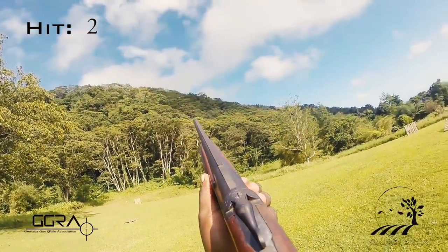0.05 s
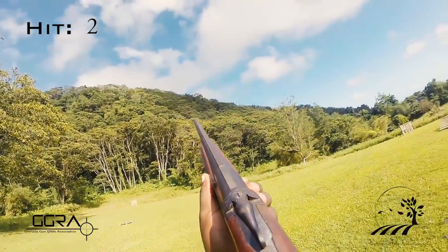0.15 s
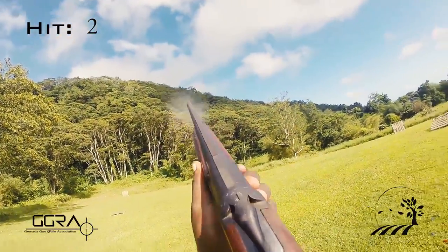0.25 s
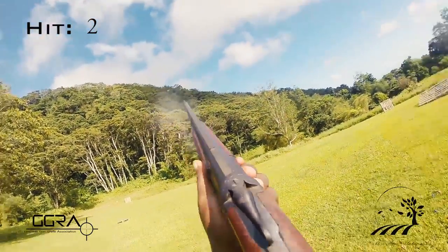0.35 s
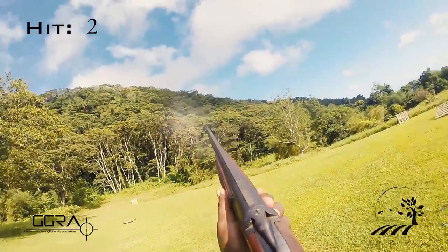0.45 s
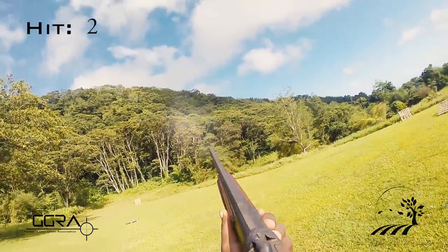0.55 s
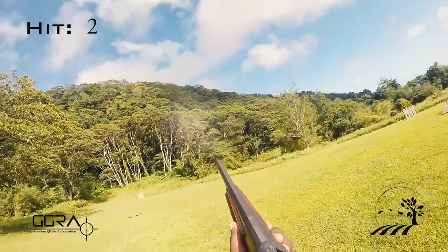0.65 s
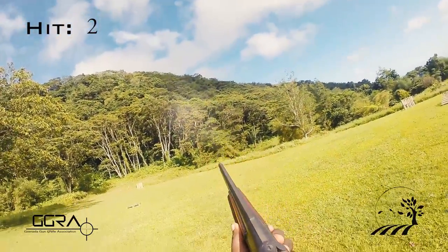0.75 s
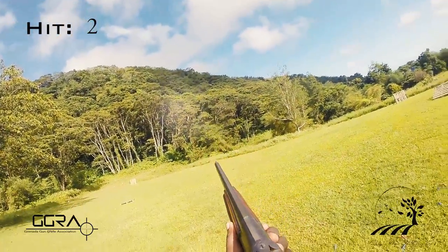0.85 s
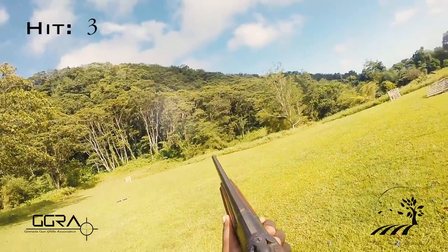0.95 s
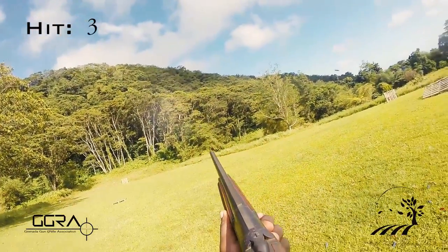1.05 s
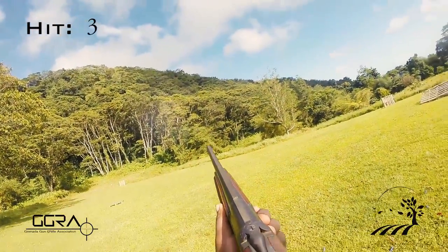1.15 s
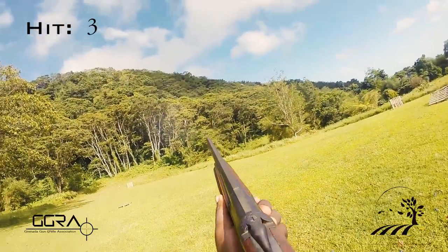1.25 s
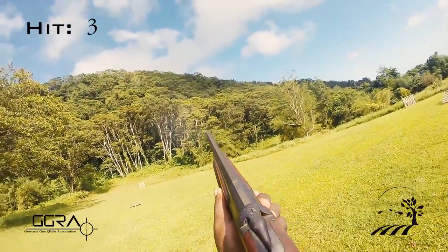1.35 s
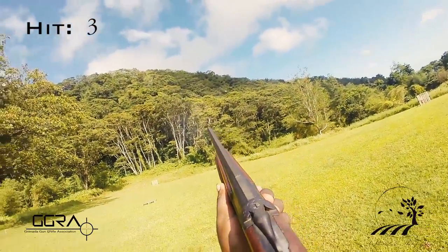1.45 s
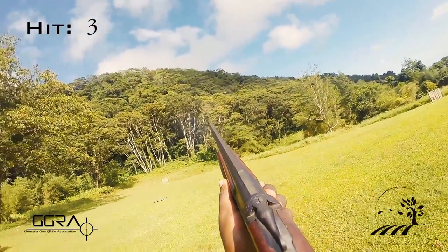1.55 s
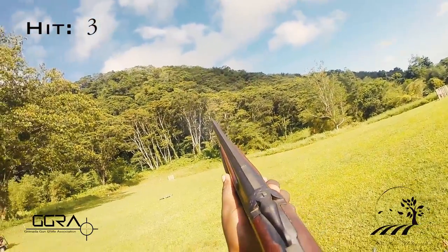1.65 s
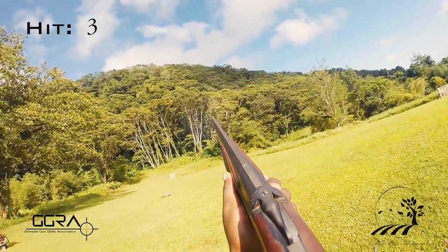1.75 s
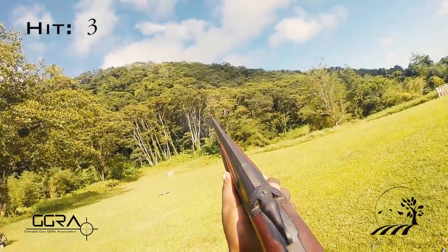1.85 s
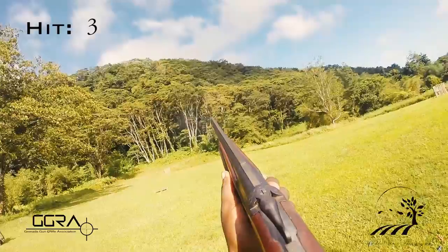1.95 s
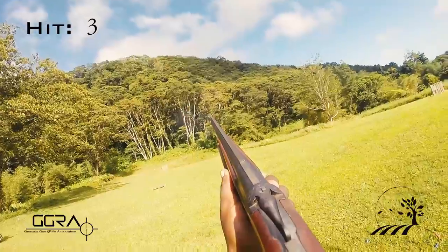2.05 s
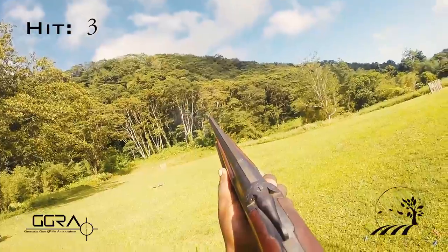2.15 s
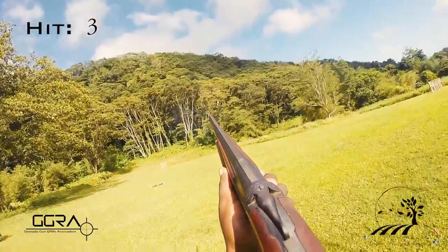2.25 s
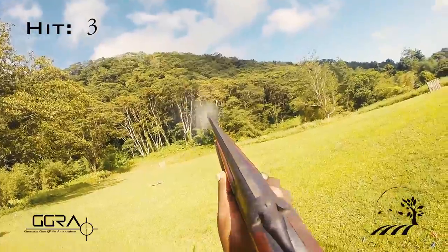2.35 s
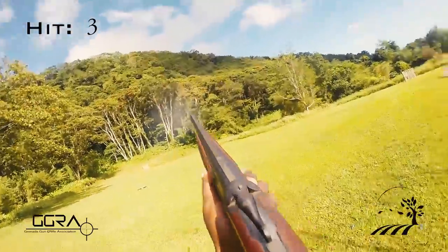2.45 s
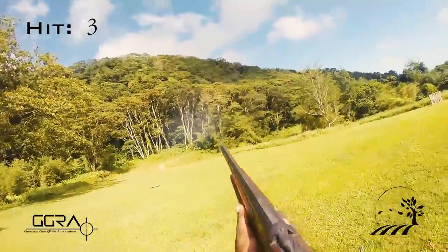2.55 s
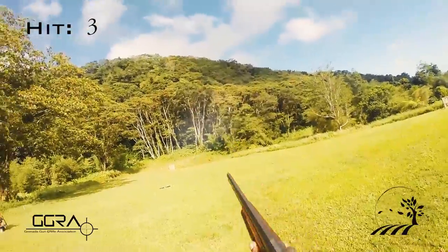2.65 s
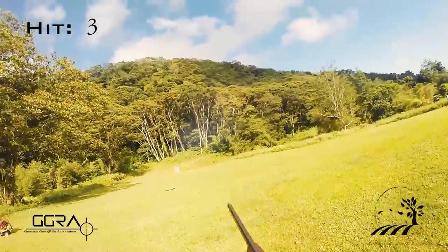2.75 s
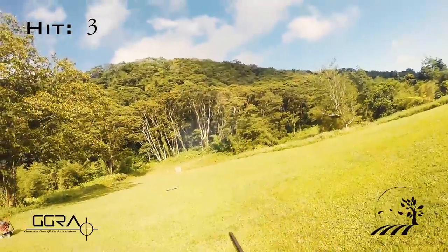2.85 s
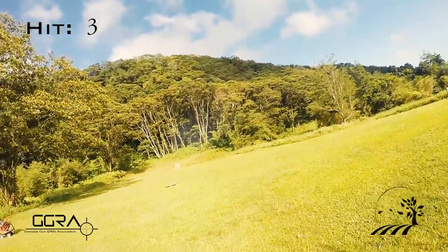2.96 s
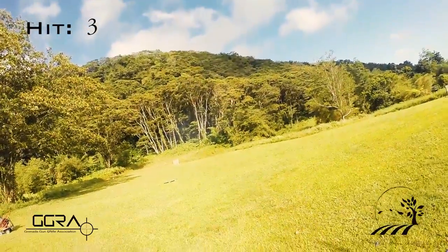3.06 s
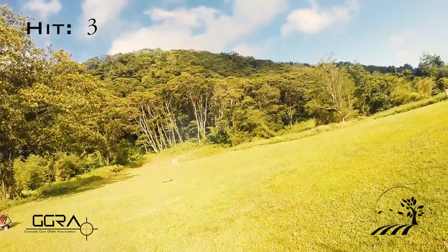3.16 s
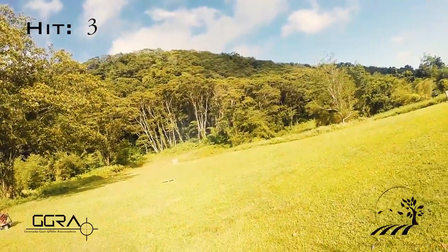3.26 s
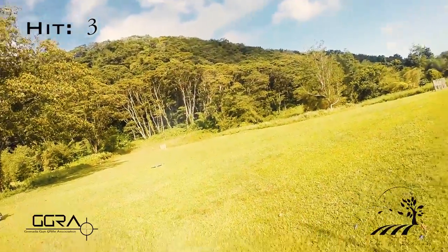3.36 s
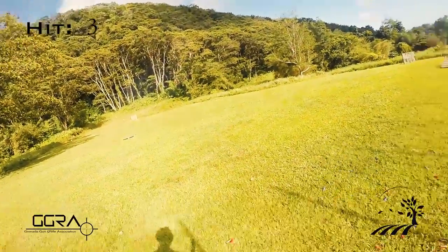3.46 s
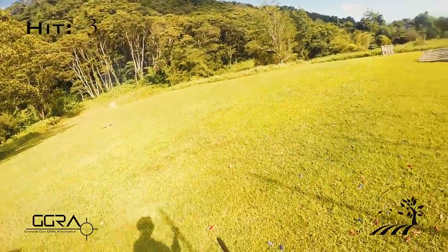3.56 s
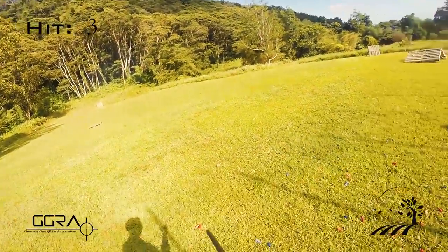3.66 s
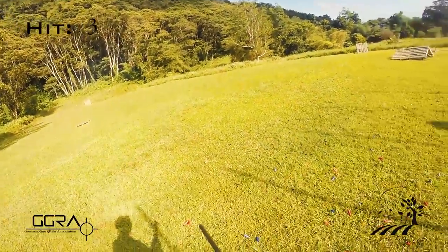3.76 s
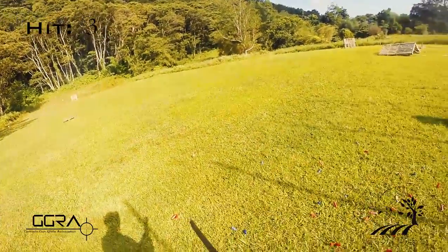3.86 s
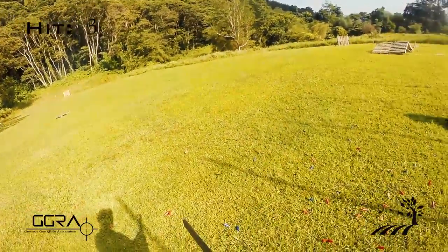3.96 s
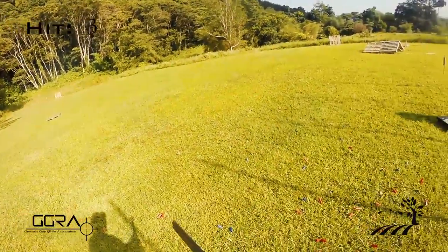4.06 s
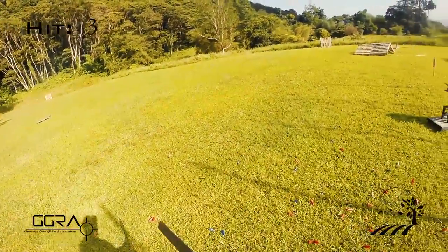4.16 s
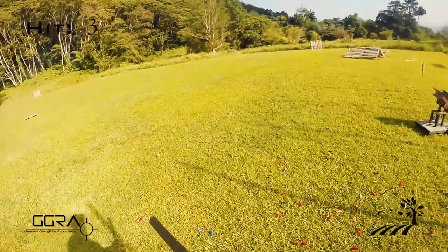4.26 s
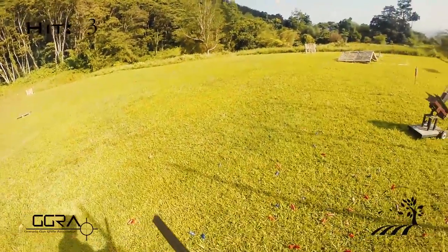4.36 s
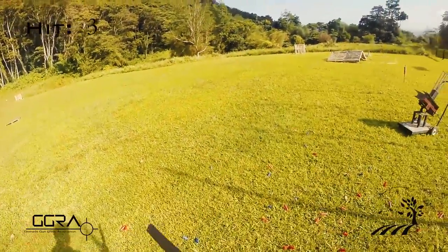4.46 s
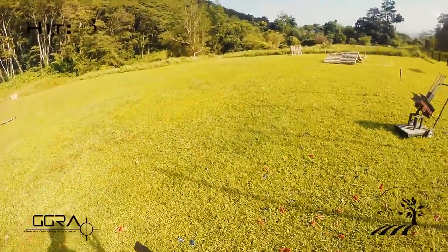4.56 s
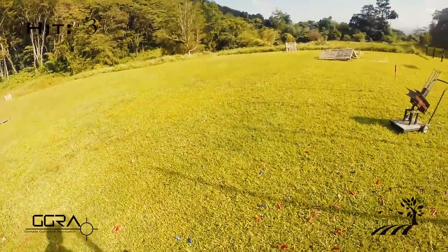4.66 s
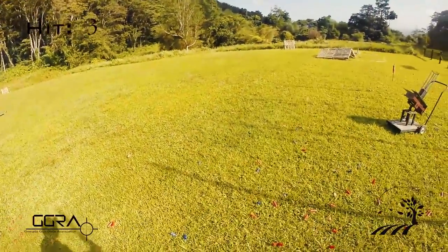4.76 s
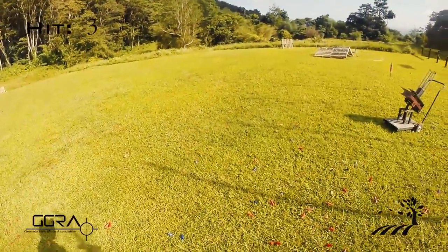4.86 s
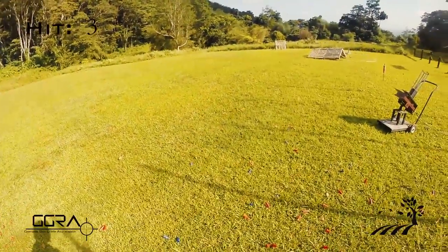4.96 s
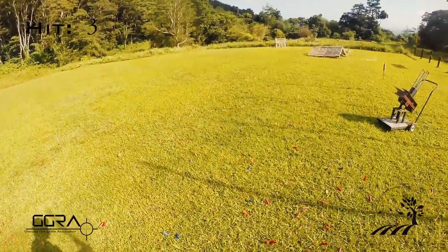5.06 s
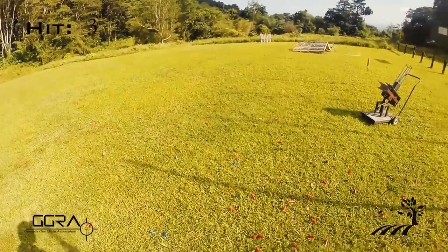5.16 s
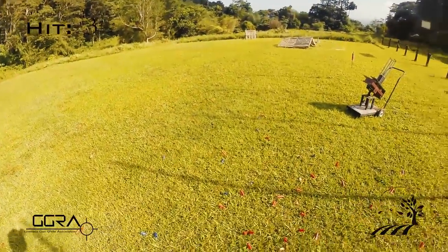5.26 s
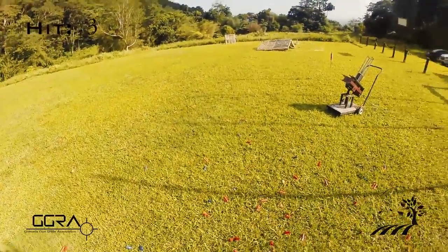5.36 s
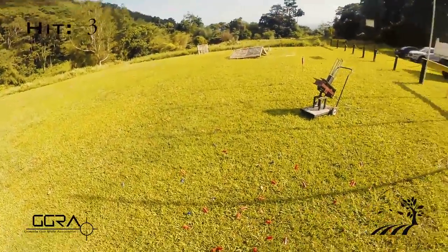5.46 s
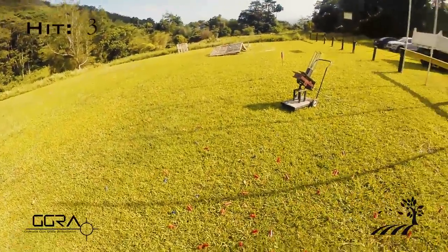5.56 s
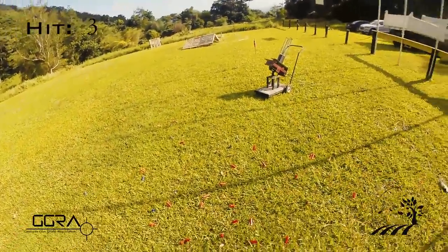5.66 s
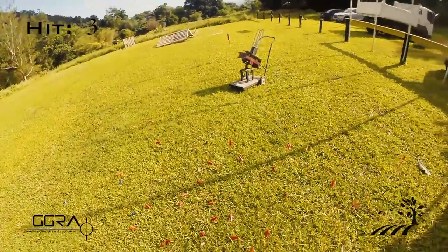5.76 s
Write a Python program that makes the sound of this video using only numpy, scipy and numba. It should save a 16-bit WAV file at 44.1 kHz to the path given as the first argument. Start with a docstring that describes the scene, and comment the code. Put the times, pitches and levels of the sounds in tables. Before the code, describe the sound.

A shotgun fires twice outdoors with overloaded cracks and woodland echoes, a distant clay break, low wind rumble, then metallic clicks of the gun opening.

```python
"""Two shotgun blasts among wooded hills

A small camera in a housing worn by the shooter hears two blasts: oscillating pulses with gas noise that overload
its microphone. Single-pulse echoes come off near objects, then decaying noise bands form the wash of the woods.
Noise bursts break a clay target after the first shot; struck steel modes are the gun, later broken open.
A wandering low tone with band noise rumbles, from wind and in the wake of the shots, over breeze hiss and far
chirps; the gain ducks after each blast."""
import sys
import numpy as np
from scipy import signal
from scipy.fft import rfft, irfft, next_fast_len
from scipy.io import wavfile
from scipy.ndimage import uniform_filter1d
from numba import njit

SR = 44100
rng = np.random.default_rng(int(sys.argv[2]) if len(sys.argv) > 2 else 0)


def volts_from_db(level):
    """Convert decibel levels to linear amplitude ratios."""
    exponent = np.asarray(level, float) / 20
    return 10 ** exponent


def int16_out(signal):
    """Quantize to a 16-bit WAV file."""
    q = np.round(np.clip(np.atleast_2d(signal).T, -1, 1) * 32767)
    wavfile.write(sys.argv[1], SR, q.astype(np.int16))


N = 255838
T = np.arange(N) / SR


def unit(x):
    """Normalization: scale to rms 1."""
    return x / np.sqrt(np.mean(x ** 2))


def hiss(gain_at):
    """Spectral shaping: steady Gaussian noise, rms 1, with the amplitude spectrum gain_at(Hz)."""
    size = next_fast_len(N)
    hz = np.maximum(np.arange(size // 2 + 1) * SR / size, 1)
    spectrum = rfft(rng.standard_normal(size)) * gain_at(hz)
    return unit(irfft(spectrum, size)[:N])


def curve(points):
    """Log-frequency interpolation: gain along (Hz, dB) points."""
    f, db = np.transpose(points)
    return lambda hz: volts_from_db(np.interp(np.log(hz), np.log(f), db))


def peak(hz, centre_hz, width_hz):
    """Simple resonance: magnitude of one mode, 1 at its centre."""
    return 1 / np.sqrt(1 + ((hz - centre_hz ** 2 / hz) / width_hz) ** 2)


def fade(t, t60):
    """Exponential decay: silent before t = 0, then down 60 dB in t60."""
    return (t >= 0) * np.exp(-np.log(1000) * np.maximum(t, 0) / t60)


def add(out, s, x):
    """Superposition: mix x into out from time s."""
    i = int(s * SR)
    out[i:i + len(x)] += x[:N - i]


def ring(kick, modes):
    """Modal response: the kick convolved with decaying modes (Hz, dB, t60)."""
    t = T[:SR // 4]
    response = sum(volts_from_db(db) * fade(t, t60) * np.sin(2 * np.pi * hz * t) for hz, db, t60 in modes)
    return signal.fftconvolve(kick, response)


def walk(rate):
    """Low-passed random process: slow chance of rms 1, with rate new values a second."""
    k = int(SR / rate)
    steps = np.repeat(rng.standard_normal(N // k + 1), k)
    return unit(uniform_filter1d(uniform_filter1d(steps, k), k)[:N])


# Spectrum of the breeze: f/Hz, relative level/dB
BREEZE_SPECTRUM = [(12, -31), (20, 3.5), (47, -5.5), (87, -12), (361, -18), (451, -21), (580, -22),
                   (832, -23), (4300, -35.5), (5080, -35.5), (7290, -41), (10200, -45.5), (14200, -45.5),
                   (15400, -52.5)]
# Narrow hiss of the electronics: f/Hz, width/Hz, level/dB
ELECTRONIC_WHINE = [(5000, 99, -80), (7950, 120, -86), (10000, 200, -80.5)]


def air():
    """Broadband turbulence noise: breeze in grass and leaves, with narrow-band whine of the electronics."""
    whine = sum(volts_from_db(db) * hiss(lambda hz: peak(hz, f, w) ** 2) for f, w, db in ELECTRONIC_WHINE)
    return volts_from_db(-52.5) * hiss(curve(BREEZE_SPECTRUM)) + whine


# Level of the low rumble, from wind and in the wake of the shots, before lumps and buffets:
# t/s, rocking level/dB, flutter level/dB
RUMBLE_LEVEL = [(0.0, -48.5, -44.5), (.3, -50, -49), (.47, -34, -37), (0.559, -44, -69), (.9, -50.5, -81),
                (1.35, -51, -47.5), (1.599, -52, -47.5), (2.0, -48.5, -46), (2.4, -51.5, -51.5),
                (2.579, -30.5, -29.5), (2.7, -50.5, -72.5), (3.2, -55.5, -63.5), (3.5, -49, -62),
                (3.8, -63, -64), (4.05, -53, -65), (4.45, -52.5, -63), (4.9, -43, -55), (5.25, -56, -76),
                (5.8, -58.5, -66)]
# Short swells of the rumble: t/s, rocking level/dB, half length/s
RUMBLE_BUFFETS = [(0.476, -26, 0.032), (1.303, -54, .025), (1.45, -35.5, 0.023), (1.54, -40.5, 0.024),
                  (1.599, -40, 0.018), (1.872, -45, 0.023), (2.27, -43, 0.032), (2.425, -43, 0.02),
                  (2.585, -30.5, 0.053), (3.075, -45, 0.019), (3.506, -46.5, 0.032), (3.68, -41, 0.022),
                  (3.931, -41.5, .04), (4.012, -46, 0.028), (4.339, -40.5, 0.02), (4.571, -39, 0.029),
                  (4.723, -45, 0.029), (4.841, -40, 0.018), (4.94, -31.5, 0.01), (4.983, -37.5, 0.015),
                  (5.128, -37, 0.019)]


def wind():
    """Flow-excited resonance: a low tone of wandering pitch and band noise, swelling also after the shots."""
    rock_hz, wander = 42.55, .26  # wander: widest swing of the pitch in natural log units
    lumps_db, lumps_per_s = 5.0, 22
    s, rock_db, flutter_db = np.transpose(RUMBLE_LEVEL)
    pitch_hz = rock_hz * np.exp(wander * np.tanh(walk(24)))
    rock = np.sqrt(2) * np.sin(2 * np.pi * np.cumsum(pitch_hz) / SR)
    gust = volts_from_db(-3) * hiss(lambda hz: peak(hz, 27, 19) ** 2)
    flutter = hiss(lambda hz: peak(hz, 51, 35) ** 2)
    buffets = sum(volts_from_db(db) * np.exp(-((T - at) / half) ** 2) for at, db, half in RUMBLE_BUFFETS)
    rocking = volts_from_db(np.interp(T, s, rock_db) + lumps_db * walk(lumps_per_s)) + buffets
    fluttering = volts_from_db(np.interp(T, s, flutter_db)) + volts_from_db(-19) * buffets
    return rocking * (rock + gust) + fluttering * flutter


# Knocks of the gun's metal parts, levels relative:
# t/s, level/dB, t60/s, scrape level over knock/dB, scrape f/Hz, lean of the ring/dB per octave
GUN_KNOCKS = [(0.082, -65.5, 0.047, 8.5, 4130, -24), (2.1418, -55.5, 0.036, 4, 5500, -24.5),
              (3.5265, -37.5, 0.011, -5.5, 2060, -9.5), (3.639, -52.5, 0.12, -9, 3500, -15),
              (4.584, -57, 0.046, -4, 3030, -6.5), (4.877, -40, 0.032, 0, 6120, 2),
              (4.905, -41.5, 0.019, -1, 6000, 10.5), (4.924, -45, 0.028, 1, 5940, 0),
              (4.935, -26, 0.039, -1.5, 6600, 9.5), (4.9767, -52, 0.019, 10, 1600, -12),
              (5.07, -69.5, 0.35, 9.5, 3000, -21.5), (5.13, -67.5, 0.29, 3.5, 2500, -7)]
# Modes of the steel, before the lean: f/Hz, relative level/dB, t60/s
STEEL_MODES = [(1380, -8, .016), (1900, -3, .01), (2380, 0, .012), (2700, 1, .018), (3200, -2, .012),
               (3650, -5, .012), (4500, -13, .01), (5350, -13, .012), (6000, -31, .07), (6650, -26, .05),
               (7400, -18, .012), (8200, -18, .01), (10500, -21, .008)]
# Thin rings of loose small parts, before their chatter: t/s, f/Hz, level/dB, t60/s
LOOSE_PARTS = [(5.07, 4450, -55, .12), (5.09, 5200, -63, .15), (5.128, 3800, -59, .25),
               (5.13, 4400, -59, .1), (5.2, 4400, -60, .1), (5.205, 5200, -61, .12)]


def action():
    """Modal excitation: short noise pushes ring the same steel under a scrape; loose parts ring; a hand rubs."""
    out, t = np.zeros(N), T[:SR // 4]
    for s, db, t60, scrape_db, scrape_hz, lean_db in GUN_KNOCKS:
        shape = np.minimum(t / 0.0013, 1) * fade(t, t60)
        modes = [(hz, g + lean_db * np.log2(hz / 2600), long) for hz, g, long in STEEL_MODES]
        # no bass; knocks with a low scrape are dull
        noise = hiss(lambda hz: np.minimum(hz / 1300, 1) ** 4 / (1 + (hz / scrape_hz / 1.6) ** 4))
        push = shape * noise[:len(t)]
        add(out, s, volts_from_db(db - 20) * ring(push, modes))
        scrape = shape * hiss(lambda hz: peak(hz, scrape_hz, scrape_hz) ** 2)[:len(t)]
        add(out, s, volts_from_db(db + scrape_db) * scrape)
    for s, hz, db, t60 in LOOSE_PARTS:
        chatter = 1 + .5 * walk(300)[:len(t)]  # the part chatters against its seat
        add(out, s, chatter * ring(np.ones(1), [(hz, db, t60)]))
    # a hand rubs along the stock
    rub_s, rub_half_s = 4.795, .04
    rub = np.exp(-((T - rub_s) / rub_half_s) ** 2) * hiss(lambda hz: peak(hz, 1734, 1300) ** 2)
    return out + volts_from_db(-58) * rub


# The two shots, levels relative:
# t/s, blast level/dB, hammer blow level/dB, hammer lead/s, low shove of the pressure wave level/dB
SHOTS = [(0.334, 1.5, -21, .005, -22), (2.4574, 3, -10, 0.0055, -13)]
# The struck housing swings low first, then hands over to a higher mode:
# f/Hz, relative level/dB, start t/s, held/s, t60/s
HOUSING_SWING = [(1150, 2, 0, .0013, .004), (3450, -3, 0, .0018, .012), (2380, 5, .0017, .0012, .004),
                 (2550, -3, .0042, .0007, .016), (2820, -9, .002, .001, .02), (3600, -18, .004, .001, .04),
                 (4600, -12, .0005, .001, .012), (6200, -12, .001, .001, .01), (7700, -10, 0, .001, .01),
                 (1390, -12, .002, .001, .03)]
# A low thump rings on after each blast and dies away: f/Hz, relative level/dB, start t/s, t60/s
LOW_THUMP = (44, -8, .009, .24)


def blasts():
    """Impulsive excitation: hammer blow through the stock, inward swings, gas noise and a low ringing thump."""
    out, t = np.zeros(N), T[:SR // 4]
    swing = np.zeros(len(t))
    for hz, db, s, held, t60 in HOUSING_SWING:
        envelope = (t >= s) * fade(np.maximum(t - s - held, 0), t60)
        swing -= volts_from_db(db) * envelope * np.sin(2 * np.pi * hz * (t - s))
    hz, db, s, t60 = LOW_THUMP
    swing += volts_from_db(db) * fade(t - s, t60) * np.sin(2 * np.pi * hz * (t - s))
    hammer_modes = [(2800, 2.5, 0.0027), (5000, -7.5, 0.0014), (6700, -12, 0.00067)]  # Hz, dB, t60 s
    for s, blast_db, hammer_db, lead, shove_db in SHOTS:
        gas = volts_from_db(-6) * fade(t, 0.026) * hiss(lambda hz: peak(hz, 4300, 2800) ** 2)[:len(t)]
        add(out, s, -ring(np.ones(1), [(304, shove_db, .03)]))
        add(out, s, volts_from_db(blast_db) * (swing + gas))
        rattle = np.minimum(t / 0.0021, 1) ** 2 * fade(t, 0.055) * rng.standard_normal(len(t))
        add(out, s - lead, volts_from_db(hammer_db - 4.5) * ring(rattle, hammer_modes))
    return out


# Resonances of the housing: f/Hz, width/Hz, relative level/dB
HOUSING_MODES = [(1406, 97, -1.5), (2080, 97, -15), (2345, 88, -9), (2821, 170, -12.5), (3580, 77, -20.5),
                 (4310, 78, -18), (5200, 160, -17)]
# Spectrum of the middle of the wash: f/Hz, relative level/dB
WASH_SPECTRUM = [(410, -34), (700, -15.5), (895, -18), (1430, 0.5), (1660, -11.5), (2810, -16.5),
                 (3060, -18), (9000, -38), (11700, -66.5), (19800, -120)]
# Parts of the landscape that answer each shot: the ground at the feet, the field, scattered bushes,
# the tree line, the wood, the hill: delay after the shot/s, held/s, base t60/s,
# middle level/dB, bass level/dB, treble level/dB
LANDSCAPE_RETURNS = [(.004, 0.0011, 0.31, -26.5, -41, -32), (.02, .14, .24, -33, -50.5, -38.5),
                     (.19, 0.13, 0.28, -48, -78, -51.5), (0.308, .004, 1.58, -41, -53.5, -54.5),
                     (0.503, 0.011, 2.5, -45, -50, -62), (.76, 0.14, 3.5, -54, -52, -71.5)]


def wash():
    """Diffuse reverberation: both shots excite the same delayed returns, whose band powers add."""
    rise_s, bass_t60_ratio = .003, 0.98
    treble_t60_s = 1.0  # further treble loss in leaves and air, from each arrival
    body = curve(WASH_SPECTRUM)

    def middle_gain(hz):
        """Parallel resonances: the housing colours the body of the wash."""
        return sum(volts_from_db(db) * peak(hz, f, w) ** 2 for f, w, db in HOUSING_MODES) + volts_from_db(-1.0) * body(hz)

    middle = hiss(middle_gain)
    bass = hiss(lambda hz: peak(hz, 410, 570) ** 2)
    treble = hiss(lambda hz: peak(hz, 4300, 3400) ** 2)
    power = np.zeros((3, N))
    patchy = volts_from_db(1.8 * walk(90))  # many separate trunks: the wash arrives in lumps
    for s, *_ in SHOTS:
        for after, held, t60, *levels in LANDSCAPE_RETURNS:
            t = T - s - after
            for k, t60_ratio in enumerate((1, bass_t60_ratio, 1)):
                shape = np.clip(t / rise_s, 0, 1) * fade(np.maximum(t - held, 0), t60 * t60_ratio)
                if k == 2:
                    shape = shape * fade(t, treble_t60_s)
                power[k] += (volts_from_db(levels[k]) * shape) ** 2
    return patchy * (np.sqrt(power) * [middle, bass, treble]).sum(axis=0)


# Slaps off near objects: t/s, level/dB, pulse length/ms, ring level over pulse/dB
NEAR_SLAPS = [(0.3422, -13.5, 0.83, -8.5), (0.3964, -8, 1.4, -20), (0.3991, -19, 3.1, -4),
              (0.4258, -6.5, 3.7, -3), (0.471, -43, 1.5, 20), (2.4658, -9, 0.94, -5.5),
              (2.4908, -17, 2, -17.5), (2.5007, -15.5, 2.6, -5.5), (2.5347, -13, 3.7, 0.5)]


def slaps():
    """Discrete reflection: each slap is one rounded push and pull of pressure that also rings the housing."""
    out, t = np.zeros(N), T[:SR // 50]
    # Hz, dB, t60 s
    shell_modes = [(1359, -2, 0.0042), (2500, 1.0, 0.005), (3420, -1.5, 0.0016), (5500, -9.5, 0.009)]
    shell = ring(np.hanning(8) / 3, shell_modes)[:len(t)]
    for s, db, ms, ring_db in NEAR_SLAPS:
        u = np.minimum(t * 1000 / ms, 1)
        pulse = np.sin(2 * np.pi * u ** 0.8) * (1 - u ** 2.6)  # steeper front than tail
        add(out, s, volts_from_db(db) * (pulse + volts_from_db(ring_db) * shell))
    return out


# The clay bursts and its shards rattle:
# t/s, level/dB, t60/s, centre f/Hz, relative ping level of the shards/dB
CLAY_BURSTS = [(0.97, -37.5, 0.13, 6000, 15), (1.01, -42.5, 0.39, 2980, -19),
               (1.023, -41.5, 0.064, 5000, -7), (1.05, -43, 0.17, 4400, -13),
               (1.091, -49.5, 0.53, 3540, -23)]


def clay():
    """Brittle fracture: decaying bursts of noise from some way off; the shards ping."""
    def burst(centre_hz, ping_db):
        """Parallel resonances: broad noise, a dull body and the ping."""
        def gain(hz):
            broad = peak(hz, centre_hz, 1.36 * centre_hz) ** 2
            body = volts_from_db(7.5) * peak(hz, 2680, 750) ** 2
            ping = volts_from_db(ping_db) * peak(hz, 3490, 230) ** 2 + volts_from_db(-24) * peak(hz, 7500, 800) ** 2
            return broad * (0.6 + body + ping)
        return hiss(gain)
    return sum(volts_from_db(db) * fade(T - s, t60) * burst(hz, ping_db) for s, db, t60, hz, ping_db in CLAY_BURSTS)


# Faint far chirps, before their roughness: t/s, length/s, start f/Hz, end f/Hz, level/dB
FAR_CHIRPS = [(1.245, .02, 5800, 5500, -65), (1.27, .025, 5900, 5400, -65), (2.3, .022, 5400, 5700, -64),
              (2.333, .025, 5750, 5450, -63), (4.12, .05, 5300, 5200, -64)]


def birds():
    """Frequency glide with amplitude modulation: short hoarse whistles far off in the trees."""
    out = np.zeros(N)
    for s, length, start_hz, end_hz, db in FAR_CHIRPS:
        hz = np.linspace(start_hz, end_hz, int(length * SR))
        whistle = np.sin(2 * np.pi * np.cumsum(hz) / SR)
        add(out, s, volts_from_db(db) * np.hanning(len(hz)) * whistle)
    return out * (1 + .7 * walk(500))


def scene():
    """Linear superposition: all sources at the one microphone."""
    return (air() + wind() + action() + blasts() + wash() + slaps() + clay() + birds())[None]


@njit
def alarm(x, loud, rise, hold, fall):
    """Peak detection with hold: gain pull-back, 0-1, set off by loud samples, held, then let go slowly."""
    aim, since, e, y = 0., 0., 0., np.empty(len(x))
    for i in range(len(x)):
        since += 1
        if abs(x[i]) > loud:
            aim, since = 1., 0.
        elif since > hold:
            aim *= 1 - fall
        e += (aim - e) * rise
        y[i] = e
    return y


def roll_off(x):
    """The treble ends steeply here."""
    return signal.sosfilt(signal.butter(12, 15600, fs=SR, output="sos"), x)


def record(dry):
    """Limiting and band limitation: a dull port, gain that ducks too late for the blast, clipping, a cut top."""
    port_hz, top_hz = 12500, 15200
    loud, duck_db = 1.4, 12.5  # amplitude that sets off the duck, and its full depth
    lag_s, hold_s, recover_s = .003, 0.17, 0.42  # lag and recovery are time constants
    x = signal.sosfilt(signal.butter(2, port_hz, fs=SR, output="sos"), dry)
    duck = alarm(x[0], loud, 1 / (lag_s * SR), hold_s * SR, 1 / (recover_s * SR))
    x = np.clip(x * volts_from_db(-duck_db * duck), -1, 1)
    x = signal.sosfilt(signal.ellip(8, .2, 60, top_hz, fs=SR, output="sos"), x)
    return roll_off(np.clip(x, -1, 1))


dry = scene()
out = record(dry)
int16_out(out)
```